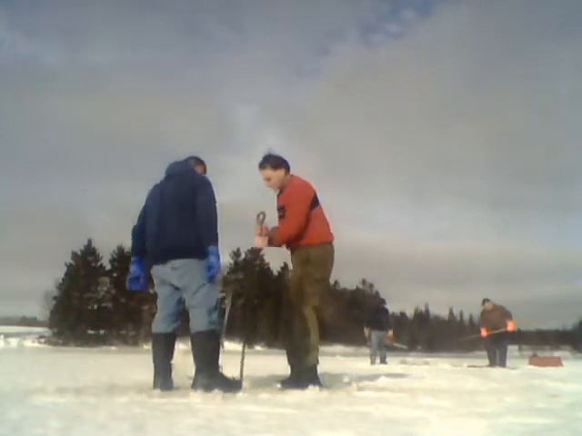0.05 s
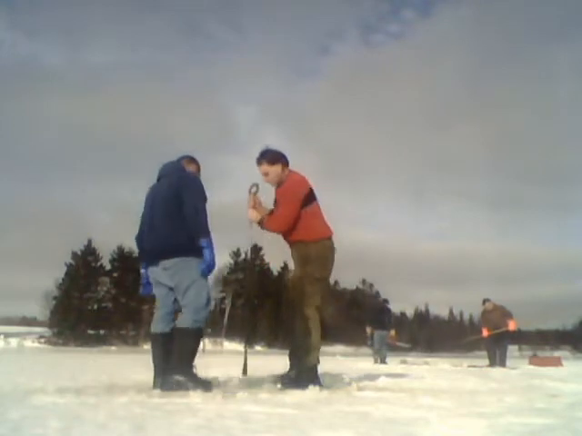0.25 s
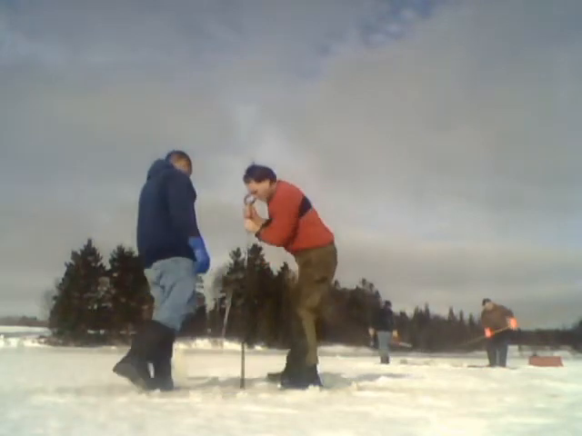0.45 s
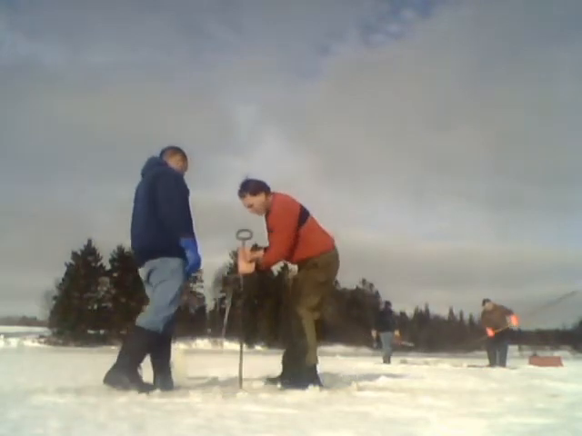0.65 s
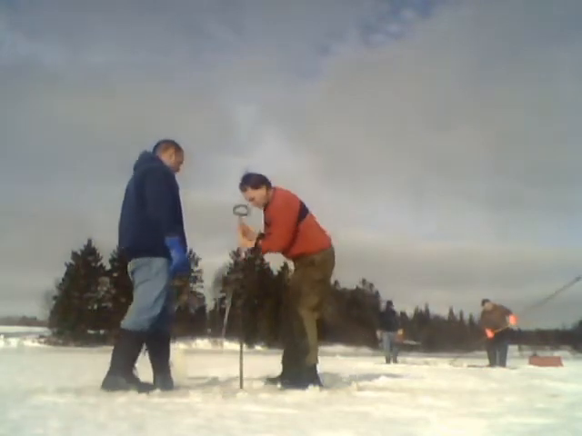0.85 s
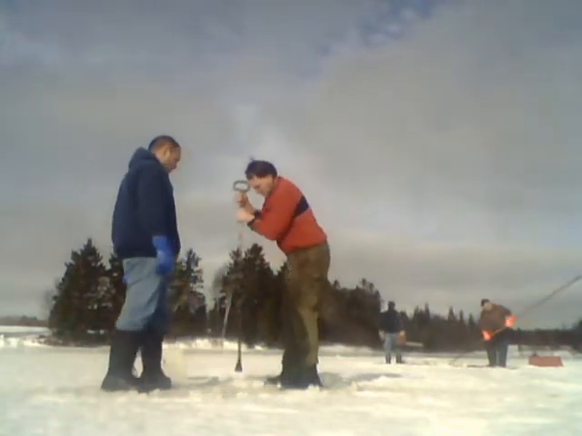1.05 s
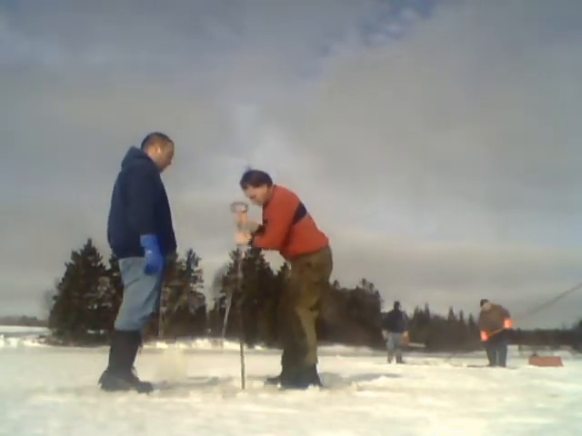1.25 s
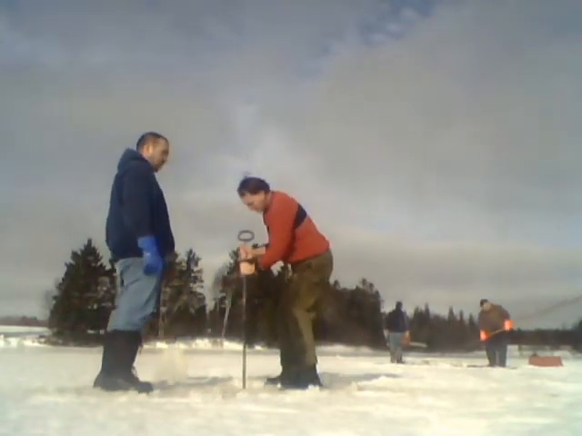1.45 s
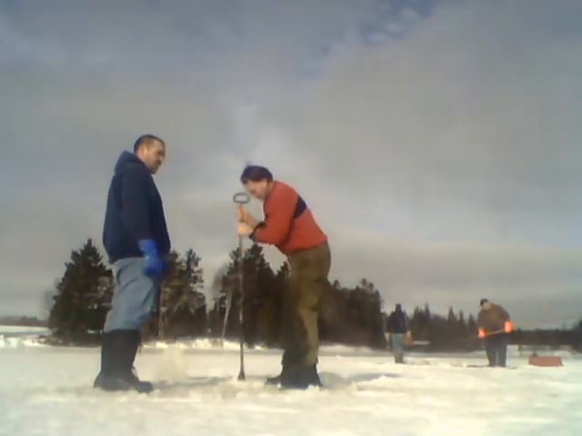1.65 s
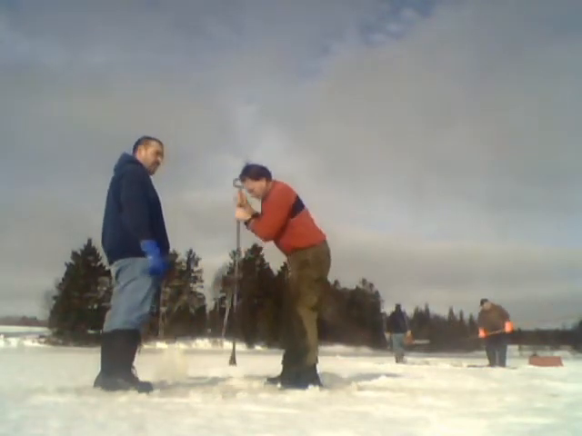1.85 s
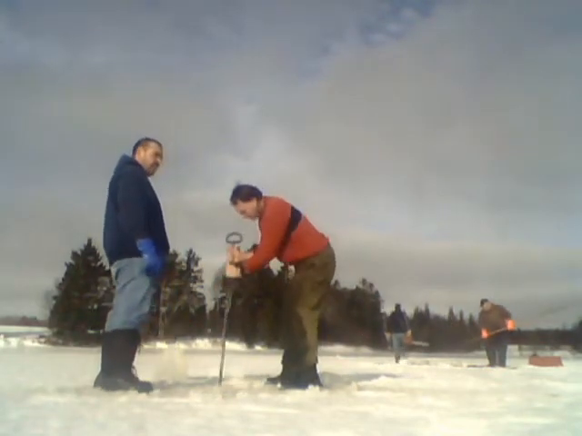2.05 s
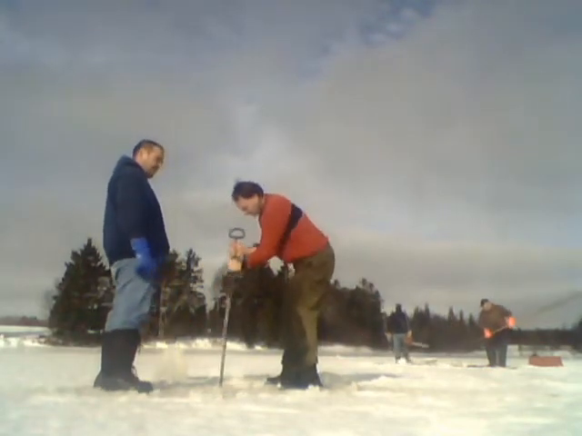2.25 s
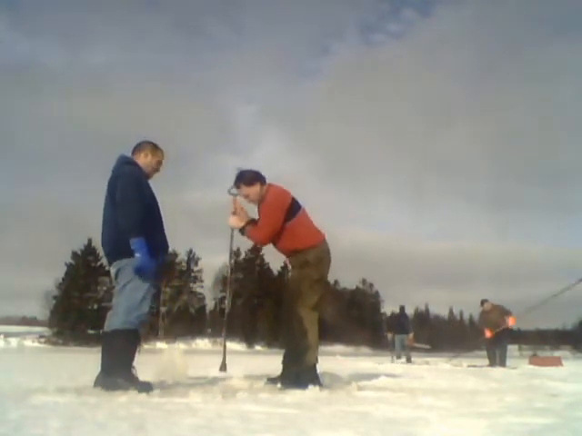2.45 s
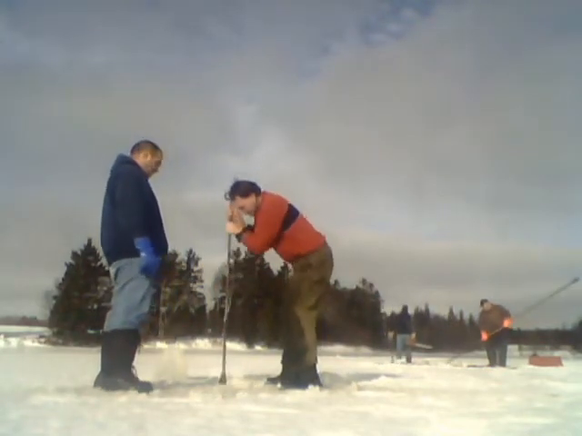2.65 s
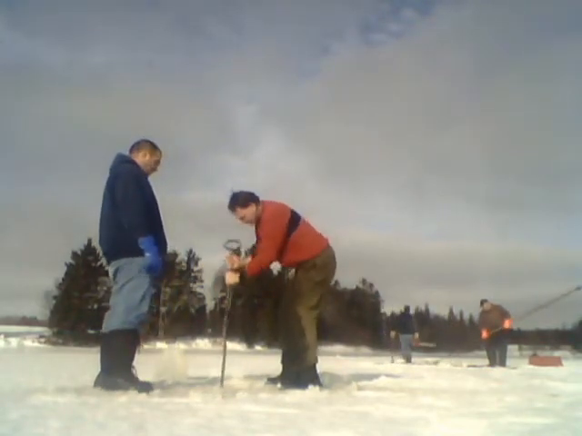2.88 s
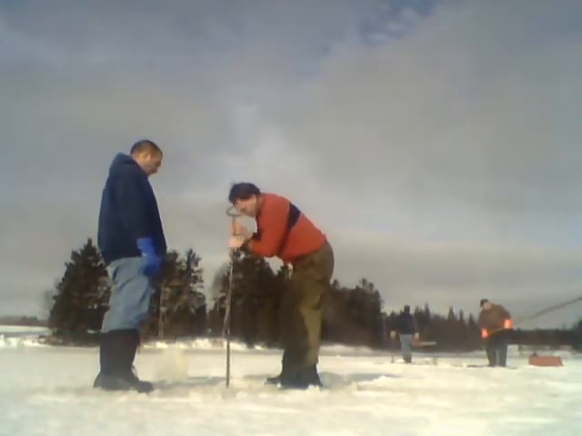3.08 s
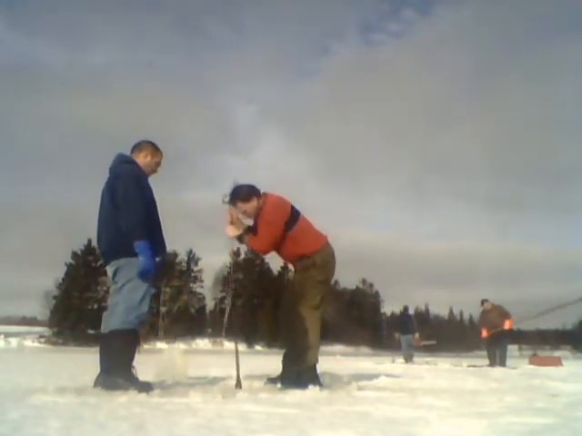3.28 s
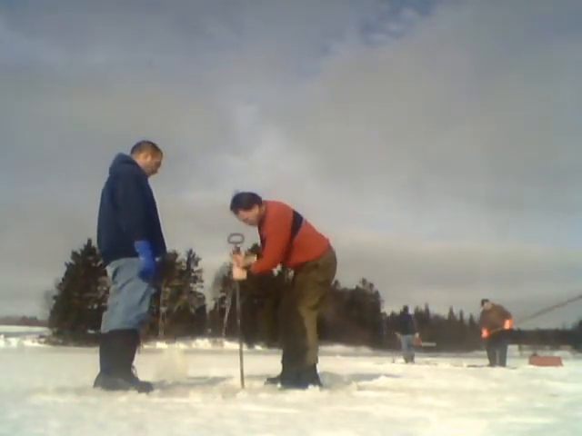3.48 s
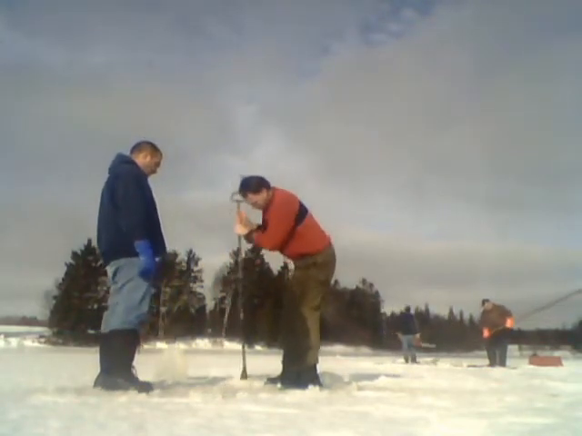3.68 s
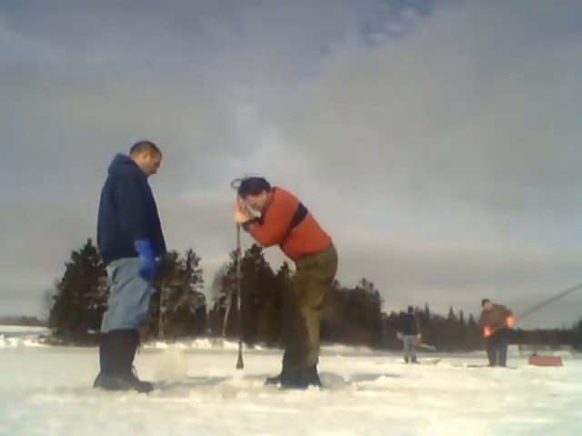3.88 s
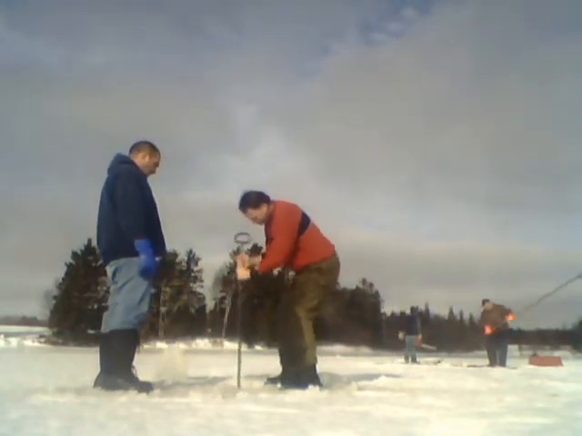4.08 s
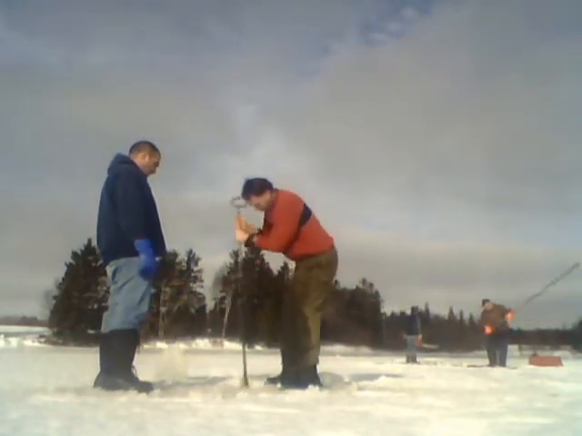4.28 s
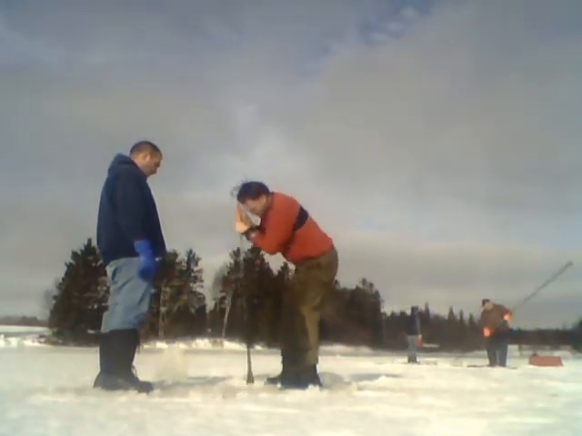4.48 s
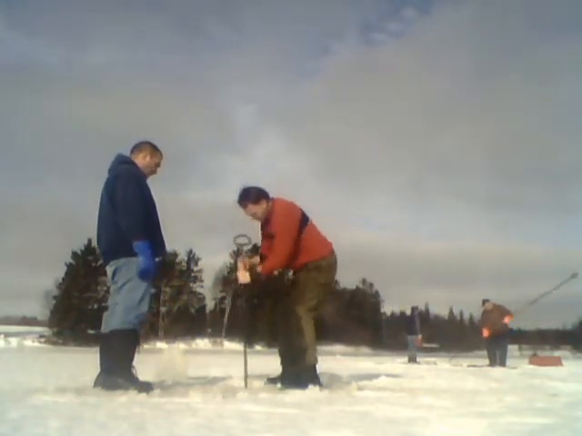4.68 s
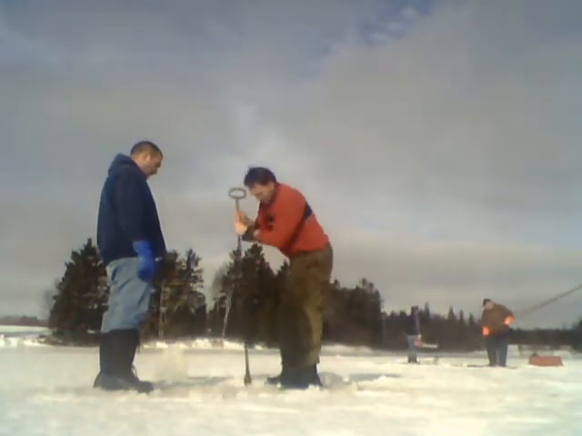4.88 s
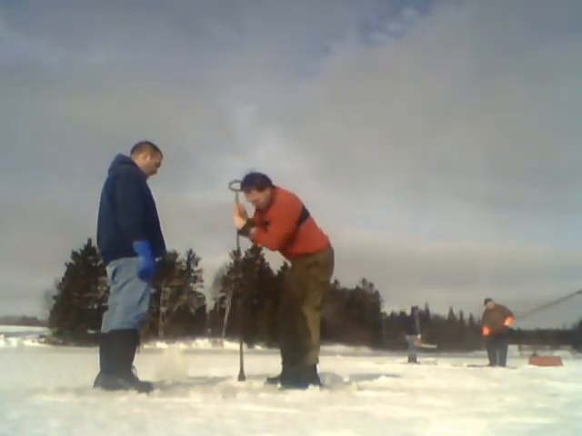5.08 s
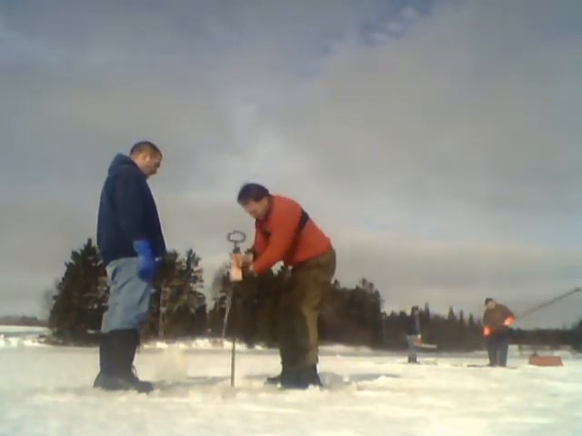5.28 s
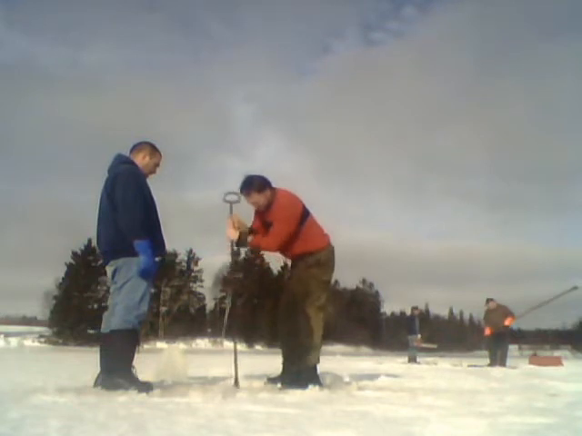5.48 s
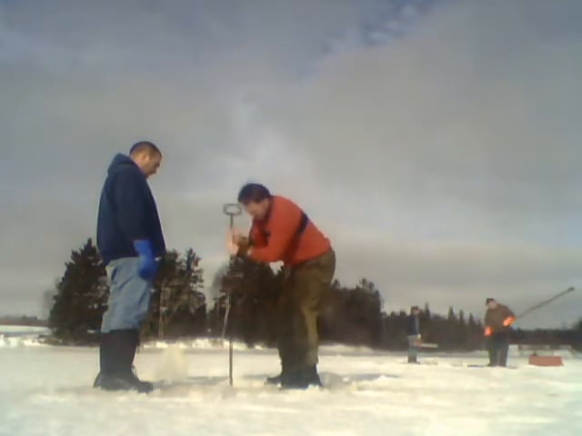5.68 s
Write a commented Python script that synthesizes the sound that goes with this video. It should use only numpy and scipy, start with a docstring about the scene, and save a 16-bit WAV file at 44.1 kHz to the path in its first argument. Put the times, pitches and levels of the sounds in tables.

```python
"""Eight wet crunches, about three in two seconds: a steel bar jabbed into a slushy hole in lake ice.
Each jab crushes ice into splinters that ring modes of bar and ice, squeezes air pockets that
ring briefly, and thumps the ice sheet. Loose ice and thin tones sound faintly between jabs.
Light wind rumbles on a small microphone over its own hiss; the recorder ticks on the last puff."""
import sys
import numpy as np
from scipy import signal
from scipy.fft import rfft, irfft
from scipy.io import wavfile

SR = 44100
rng = np.random.default_rng(int(sys.argv[2]) if len(sys.argv) > 2 else 0)


def wav_out(sig):
    """Save sig, one row per channel (or a flat mono array), as 16-bit PCM at SR to the path in sys.argv[1]."""
    wavfile.write(sys.argv[1], SR, np.round(np.clip(np.atleast_2d(sig).T, -1, 1) * 32767).astype(np.int16))


N = 252693

# force of the tip on breaking ice, one list per jab, first touch to rebound: t/s, level/dB
JAB_FORCE = [
    [(.649, -53), (.654, -46), (.661, -44), (.664, -35), (.671, -39), (.678, -51), (.69, -59), (.71, -84)],
    [(1.385, -78), (1.389, -67), (1.398, -63), (1.401, -51.5), (1.424, -73), (1.428, -46.5), (1.437, -42),
     (1.462, -67), (1.467, -51), (1.478, -57.5), (1.495, -94)],
    [(2.076, -83), (2.08, -56), (2.096, -56.5), (2.1, -44), (2.14, -52), (2.156, -43), (2.182, -89),
     (2.19, -72.5), (2.2, -72), (2.203, -60), (2.222, -85)],
    [(2.777, -86), (2.781, -48.5), (2.805, -50.5), (2.81, -46.5), (2.822, -49), (2.827, -44.5),
     (2.856, -50), (2.874, -83), (2.878, -60.5), (2.886, -64.5), (2.9, -89)],
    [(3.441, -81), (3.451, -55), (3.473, -54), (3.476, -64), (3.48, -48.5), (3.5, -59), (3.504, -33.5),
     (3.532, -66), (3.536, -51), (3.555, -93)],
    [(4.069, -83), (4.074, -76), (4.093, -73), (4.097, -49), (4.109, -47.5), (4.113, -38), (4.125, -43.5),
     (4.143, -73.5), (4.165, -79), (4.17, -77), (4.185, -86)],
    [(4.648, -88), (4.652, -73), (4.663, -68), (4.667, -60), (4.676, -63), (4.68, -47), (4.697, -61),
     (4.702, -51), (4.712, -57.5), (4.735, -93)],
    [(5.236, -88), (5.24, -81), (5.253, -77), (5.257, -63.5), (5.271, -85), (5.275, -55.5), (5.293, -52.5),
     (5.297, -48), (5.316, -53), (5.339, -90), (5.343, -60), (5.36, -82)],
]
REFERENCE_DB = -52.5   # typical crunch level


def from_db(db):
    return 10 ** (np.asarray(db) / 20)


def rms_one(x):
    return x / np.sqrt(np.mean(x ** 2) + 1e-20)


def drift(rate_hz):
    """Random wander, rms 1."""
    r = np.exp(-2 * np.pi * rate_hz / SR)
    return rms_one(signal.lfilter([1], [1, -2 * r, r * r], rng.standard_normal(N + 9000))[9000:])


def coloured(spectrum):
    """Noise shaped by rows of f/Hz, density/dB; rms 1."""
    hz, db = np.transpose(spectrum)
    bins_hz = np.arange(N // 2 + 1) * SR / N + 1
    gain = from_db(np.interp(np.log(bins_hz), np.log(hz), db))
    return rms_one(irfft(rfft(rng.standard_normal(N)) * gain, N))


def resonance(x, hz, width_hz):
    """Two-pole peak, gain 1."""
    r = np.exp(-np.pi * width_hz / SR)
    poles = [1, -2 * r * np.cos(2 * np.pi * hz / SR), r * r]
    return signal.lfilter([(1 - r * r) / 2, 0, (r * r - 1) / 2], poles, x)


def swell(hold_ms, rise_ms, fall_ms):
    """Rise, hold, exponential decay."""
    t_ms = np.arange(int(.12 * SR)) / SR * 1000
    attack = 1 - np.exp(-(t_ms / rise_ms) ** 2)
    return attack * np.exp(-np.maximum(t_ms - rise_ms - hold_ms, 0) / fall_ms)


def add(out, start_s, shape):
    i = int(start_s * SR)
    out[i:i + len(shape)] += shape[:N - i]


def rings(events, rise_ms, fall_ms, glide_per_s, waver_rad, push, slush_db):
    """Short gliding, wavering tones with a one-sided push of air and the slop of displaced slush."""
    # slush spectrum: f/Hz, density/dB
    slush_spectrum = [(60, -15), (150, -1), (300, 0.5), (450, 2), (800, 1.5), (1000, -24), (2000, -36.5)]
    out, t = np.zeros(N), np.arange(int(.12 * SR)) / SR
    start_phases = rng.normal(0, 0.61, (len(events), 1))
    waver = waver_rad * drift(190)
    slop = from_db(slush_db) * coloured(slush_spectrum)
    for (s, db, hold_ms, hz), start_phase in zip(events, start_phases):
        span = np.minimum(int(s * SR) + np.arange(len(t)), N - 1)
        phase = 2 * np.pi * hz * t * (1 + glide_per_s * t) + start_phase + waver[span]
        envelope = from_db(db) * swell(hold_ms, rise_ms, fall_ms)
        add(out, s, envelope * (np.sin(phase) + push + slop[span]))
    return out


def wind():
    """Gusts rumble on the microphone; lone puffs push its diaphragm."""
    # gusts: t/s, level/dB
    gusts = [(0.0, -71), (0.32, -69.5), (0.83, -60), (1.56, -65), (1.8, -64.5), (2.03, -56.5),
             (2.23, -66.5), (2.95, -64.5), (3.32, -68.5), (3.75, -68), (4.12, -71.5), (4.24, -65.5),
             (4.39, -72), (4.79, -66.5), (5.11, -73.5), (5.73, -58)]
    # rumble spectrum: f/Hz, density/dB
    rumble_spectrum = [(15, -7), (30, 4.5), (60, -1), (100, -0.5), (160, -15.5), (250, -20.5), (400, -55)]
    # Gaussian puffs: t/s, peak/dB, sigma/ms
    puffs = [(.362, -51.5, 3.2), (0.526, -45.5, 4), (.847, -45.5, 1.2), (1.121, -42, 4), (3.0, -46, 4.5),
             (3.91, -49, 1.8), (4.293, -52, 1.7), (4.305, -47, 0.89), (5.629, -46.5, 5.9),
             (5.677, -30, 1.25)]
    gust_db = np.interp(np.arange(N) / SR, *np.transpose(gusts))
    out = from_db(gust_db + 4.2 * drift(19) + 0.55 * drift(2.8)) * coloured(rumble_spectrum)
    t_ms = np.arange(-882, 882) / SR * 1000
    for s, db, sigma_ms in puffs:
        add(out, s - .02, from_db(db) * np.exp(-.5 * (t_ms / sigma_ms) ** 2))
    return out


def hiss():
    """Microphone self-noise, lifted at the capsule resonance."""
    # f/Hz, density/dB
    hiss_spectrum = [(88, -29.5), (150, -1), (528, -9.5), (4130, -31), (6320, -32.5), (8730, -42.5),
                     (11300, -81), (19200, -120)]
    noise = coloured(hiss_spectrum)
    capsule = from_db(-0.5) * resonance(noise, hz=6400, width_hz=230)
    return from_db(-73.5 + 0.32 * drift(7.5)) * (noise + capsule)


def crush_envelopes():
    """Drive of the low, middle and high modes: tip force in the jabs, loose ice between."""
    # mode feed per jab: low/dB, high/dB
    jab_colours = [(-8, -7), (-2, -8.5), (0.5, -6.5), (-1, -7), (3, -8.5), (-0.5, -3.5), (3, -4.5), (4, -7)]
    # loose ice crunches: t/s, level/dB, hold/ms
    loose_ice = [(0.002, -80, 29), (0.057, -90, 85), (4.776, -77, 39), (4.902, -82, 8.7)]
    low, middle, high = np.zeros((3, N))
    for jab, (low_db, high_db) in zip(JAB_FORCE, jab_colours):
        s, db = np.transpose(jab)
        force = from_db(np.interp(np.arange(s[0] * SR, s[-1] * SR) / SR, s, db))
        swing = force / from_db(REFERENCE_DB)   # low and high modes follow it slightly compressed
        add(low, s[0], swing ** 0.96 * from_db(REFERENCE_DB + low_db))
        add(middle, s[0], force)
        add(high, s[0], swing ** 0.94 * from_db(REFERENCE_DB + high_db))
    for s, db, hold_ms in loose_ice:
        for envelope, trim_db in (low, 0), (middle, 0), (high, -3.5):
            add(envelope, s, from_db(db + trim_db) * swell(hold_ms, rise_ms=2.3, fall_ms=4.56))
    return low, middle, high


def ice_crush():
    """Dense splinters of uneven size and lone cracks ring the modes of bar and ice."""
    # modes of bar and ice: f/Hz, width/Hz, gain/dB
    modes = [(1140, 410, -13), (1360, 204, -4.5), (1756, 240, -0.5), (2402, 340, 1), (2626, 536, -1),
             (3066, 105, 0), (3308, 120, -5.5), (4040, 520, -2), (5200, 1070, -5.5), (6720, 580, -5),
             (7470, 1300, -15.5)]
    # sharp cracks: t/s, impulse level/dB
    crack_impulses = [(0.6675, -5.5), (1.4384, -6.5), (2.081, -22), (2.101, -14), (2.153, -17),
                      (2.8372, -35), (3.503, -33), (3.503, -15), (4.115, -38), (4.1223, -23),
                      (4.703, -17.5), (5.276, -31), (5.3034, -19)]
    splinters_per_s, spread_db = 7800, 3.0
    splinters = (rng.random(N) < splinters_per_s / SR) * rng.choice([-1, 1], N)
    splinters = splinters * from_db(spread_db * np.minimum(rng.exponential(1, N), 4))
    signed_modes = [(hz, width, (-1) ** k * from_db(db)) for k, (hz, width, db) in enumerate(modes)]
    splinters /= np.std(sum(gain * resonance(splinters, hz, width) for hz, width, gain in signed_modes))
    low, middle, high = crush_envelopes()
    out, cracks = np.zeros((2, N))
    for s, db in crack_impulses:
        add(cracks, s, from_db([db]))
    for hz, width, gain in signed_modes:
        envelope, crack_gain = (low, 0) if hz < 2000 else (middle, 1) if hz < 3800 else (high, from_db(-2))
        uneven = from_db(1.95 * drift(58))   # the sliding tip feeds each mode unevenly
        drive = envelope * splinters * uneven + crack_gain * cracks
        out += gain * resonance(drive + 1e-18, hz, width)
    return out


def tones_and_tick():
    """Four faint thin tones, then a faint 4 kHz recorder tick on the last wind puff."""
    # t/s, level/dB, hold/ms, f/Hz
    events = [(.045, -84.5, 61, 3880), (.08, -85, 18, 5430), (.103, -81, 10, 3380), (3.075, -83, 25, 2550),
              (5.675, -64, .6, 4000)]
    return rings(events, rise_ms=0.84, fall_ms=2.3, glide_per_s=0, waver_rad=0.95, push=0, slush_db=-38)


def pockets_and_pulses():
    """Squeezed air pockets ring, rising in pitch, with a few short low pulses under the jabs."""
    # ringing pockets and, below 350 Hz, low pulses: t/s, level/dB, f/Hz
    placed = [(0.658, -37.5, 453), (0.666, -45.5, 454), (1.389, -57, 447), (1.428, -32, 372),
              (1.444, -52, 346), (1.462, -53, 418), (2.11, -49, 730), (2.124, -34.5, 699),
              (2.138, -33, 680), (2.146, -31, 440), (2.157, -39, 450), (2.19, -55.5, 766), (2.2, -50, 720),
              (2.21, -56, 337), (2.294, -60.5, 747), (2.793, -50, 430), (2.808, -35.5, 700),
              (2.817, -41.5, 665), (2.825, -28, 456), (2.831, -33, 432), (2.846, -44, 740),
              (2.859, -50.5, 580), (2.876, -48, 688), (3.449, -46.5, 477), (3.461, -34.5, 471),
              (3.477, -39, 790), (3.49, -32.5, 540), (3.5, -31.5, 444), (3.518, -40, 454),
              (3.534, -45.5, 372), (4.094, -41.5, 622), (4.1, -36, 660), (4.111, -35, 336),
              (4.119, -40, 424), (4.289, -69, 570), (4.3, -58, 500), (4.322, -66.5, 700), (4.665, -54, 574),
              (4.677, -45, 638), (4.688, -41.5, 459), (4.701, -46.5, 390), (4.78, -61, 448),
              (4.888, -60.5, 407), (4.91, -66.5, 554), (5.275, -32, 646), (5.284, -32, 570),
              (5.298, -34.5, 400), (5.307, -34, 470), (5.324, -43.5, 446), (5.343, -47.5, 715)]
    hold_ms, shorter_ms_per_db = 3.62, .05   # a loud pocket bursts sooner
    events = [(s, db, max(hold_ms - shorter_ms_per_db * (db - REFERENCE_DB), .5), hz)
              for s, db, hz in placed]
    mean_gap_s, low_hz, high_hz = .011, 340.4, 758   # small random pockets through each jab
    for jab in JAB_FORCE:
        s, db = np.transpose(jab)
        gap, pitch = rng.random((30, 2)).T
        onsets_s = s[0] + np.cumsum(gap + .5) * mean_gap_s
        levels_db = np.interp(onsets_s, s, db) - 2.5   # just under the crunch
        pitches_hz = low_hz * (high_hz / low_hz) ** pitch
        events += [(t, level, hold_ms, hz)
                   for t, level, hz in zip(onsets_s, levels_db, pitches_hz) if t < s[-1]]
    return rings(events, rise_ms=1.44, fall_ms=3.82,
                 glide_per_s=2.2, waver_rad=0.42, push=0.064, slush_db=-8.0)


def sheet_thumps():
    """The jabbed ice sheet thumps, falling in pitch."""
    # t/s, level/dB, hold/ms, f/Hz
    thumps = [(0.657, -41.5, 2.2, 187), (0.673, -37.5, 3.2, 178), (1.426, -26, 5.8, 153),
              (1.428, -48, 8.6, 65), (1.442, -31.5, 10, 161.6), (1.463, -38.5, 7.6, 178),
              (2.105, -43.5, 3, 134), (2.15, -40, 5.6, 142), (2.15, -45.5, 9, 70.6),
              (2.163, -47.5, 4.5, 158), (2.823, -43, 4.8, 146), (2.844, -38, 5.6, 171.4),
              (3.506, -42, 9, 70), (3.506, -33, 8.5, 139), (4.111, -33.5, 13, 130), (4.121, -35, 6.3, 68),
              (4.128, -21, 3, 137), (4.687, -47, 3.4, 137), (4.7, -39, 6.1, 61), (4.702, -32, 3, 113.6),
              (5.294, -38.5, 2.8, 116), (5.31, -34.5, 8.6, 66.4), (5.314, -36, 2.6, 155)]
    return rings(thumps, rise_ms=1.52, fall_ms=8.2,
                 glide_per_s=-2.5, waver_rad=0.41, push=0.06, slush_db=-23.5)


def scene():
    """Jabs, wind and hiss at one microphone."""
    low_cut = signal.butter(1, 31.0, "high", fs=SR, output="sos")
    lows = signal.sosfilt(low_cut, pockets_and_pulses() + sheet_thumps() + wind())
    return (lows + tones_and_tick() + ice_crush() + hiss())[None]


def record(dry):
    """Narrow-band recorder: treble rolls off and is cut; the converter adds faint noise."""
    rolloff_hz, stop_hz, converter_stop_hz, converter_db = 7100.0, 9700, 16000, -98.5
    soft = signal.sosfilt(signal.butter(6, rolloff_hz, fs=SR, output="sos"), dry)
    cut = signal.sosfilt(signal.cheby2(10, 50, stop_hz, fs=SR, output="sos"), soft)
    noisy = cut + from_db(converter_db) * rng.standard_normal(dry.shape)
    return signal.sosfilt(signal.cheby2(12, 70, converter_stop_hz, fs=SR, output="sos"), noisy)


dry = scene()
out = record(dry)
wav_out(out)
```